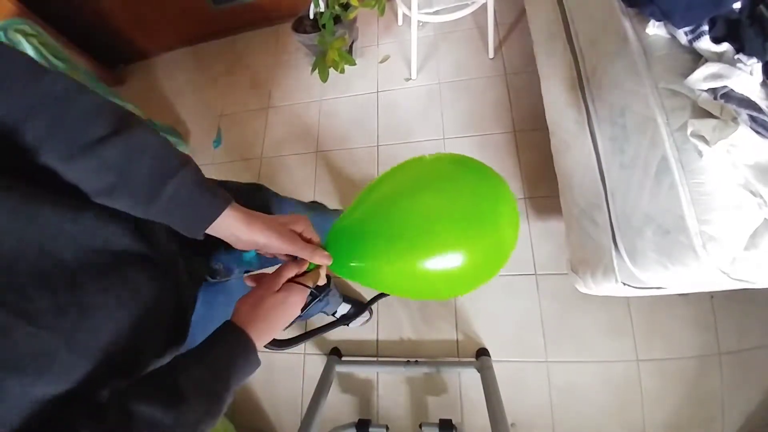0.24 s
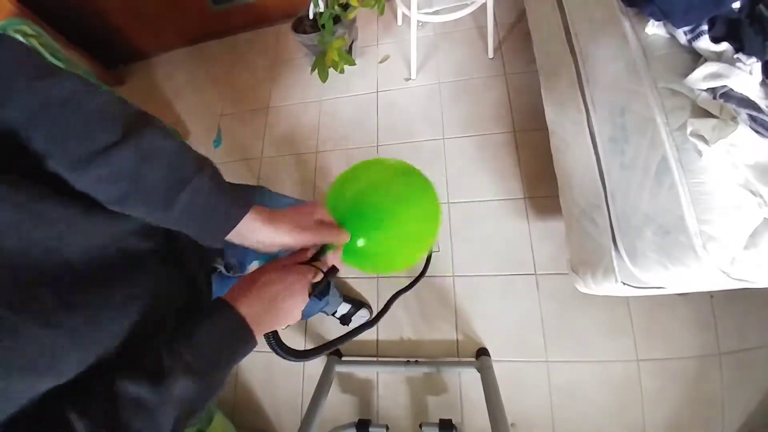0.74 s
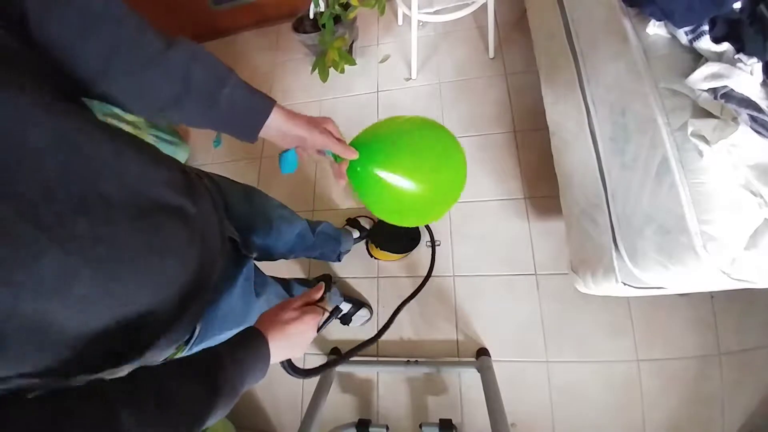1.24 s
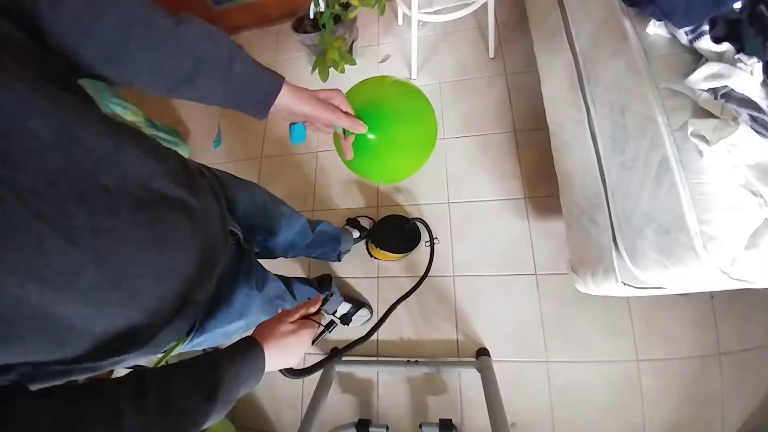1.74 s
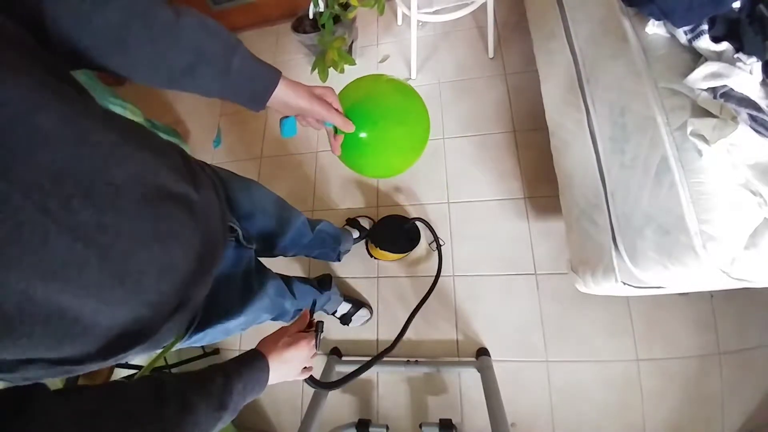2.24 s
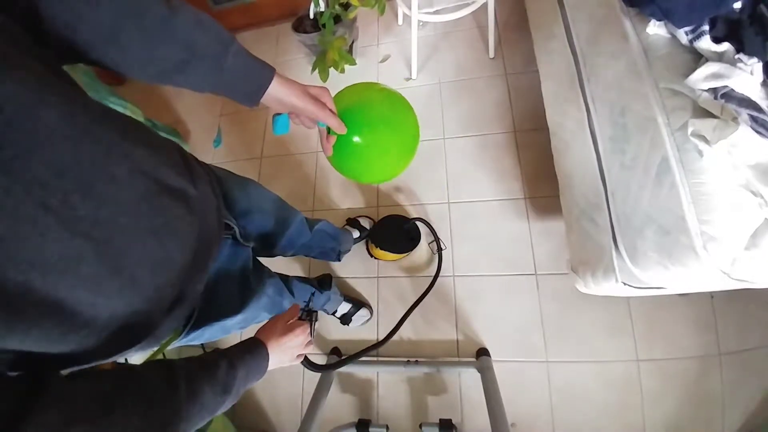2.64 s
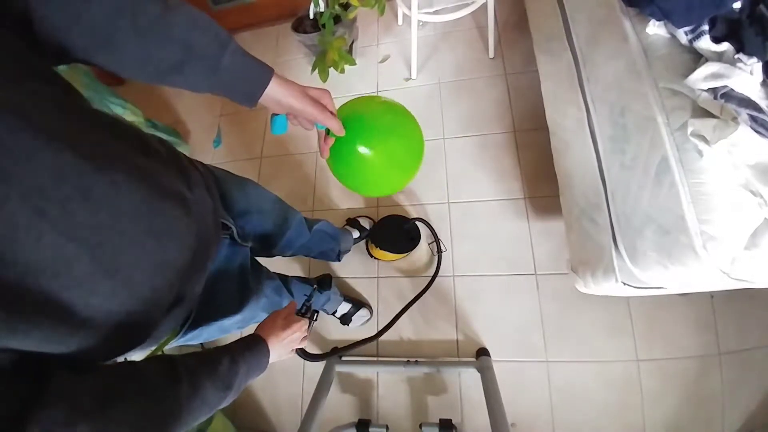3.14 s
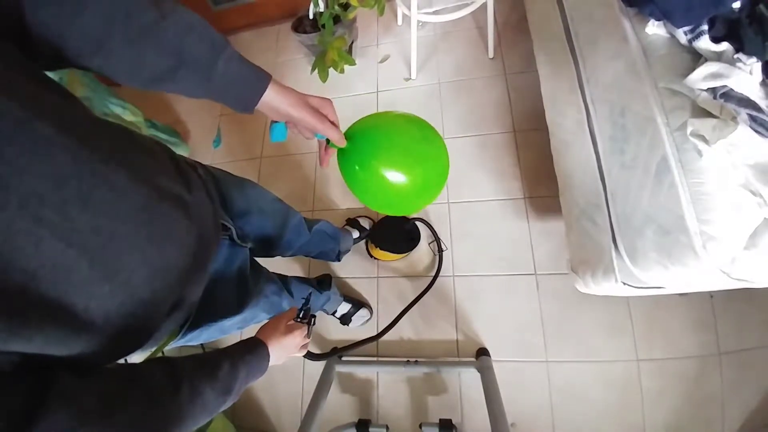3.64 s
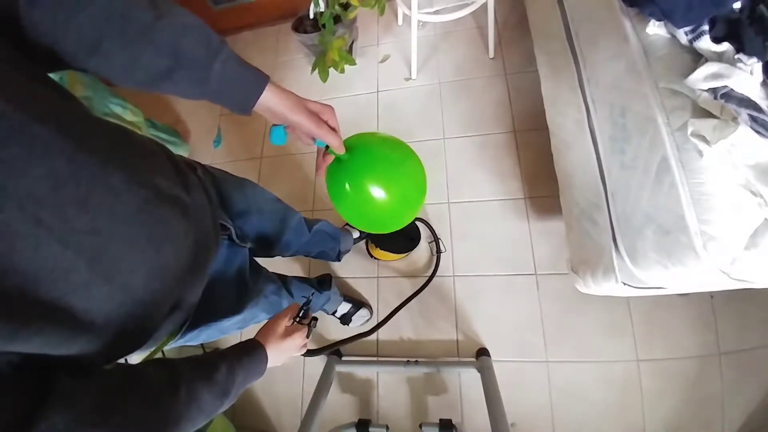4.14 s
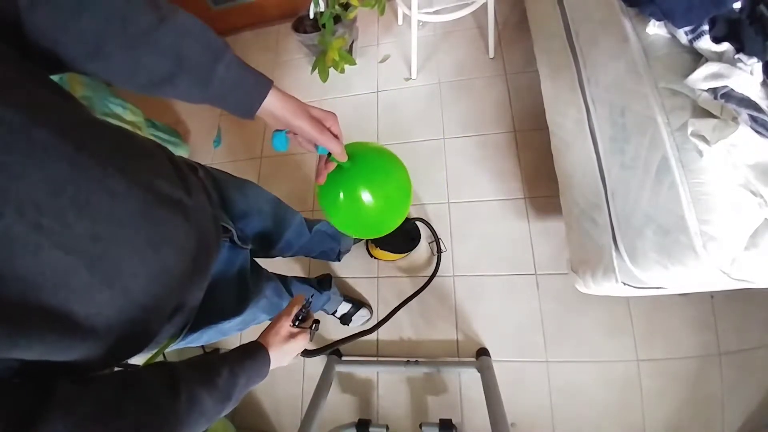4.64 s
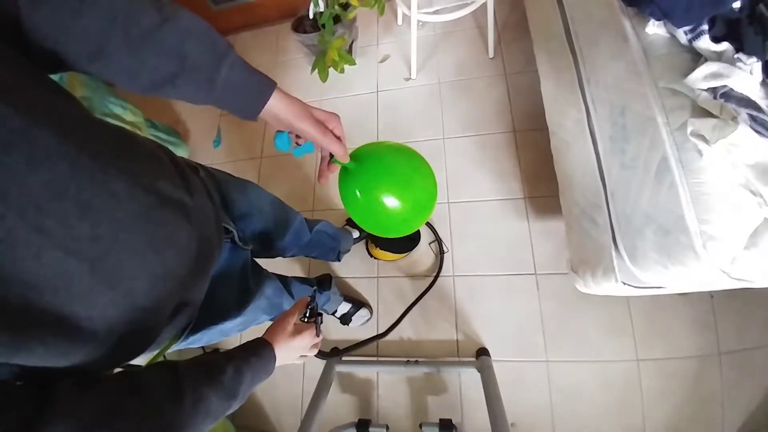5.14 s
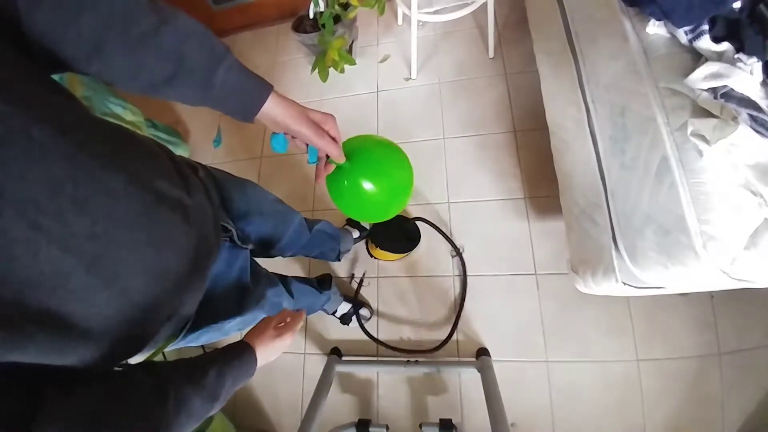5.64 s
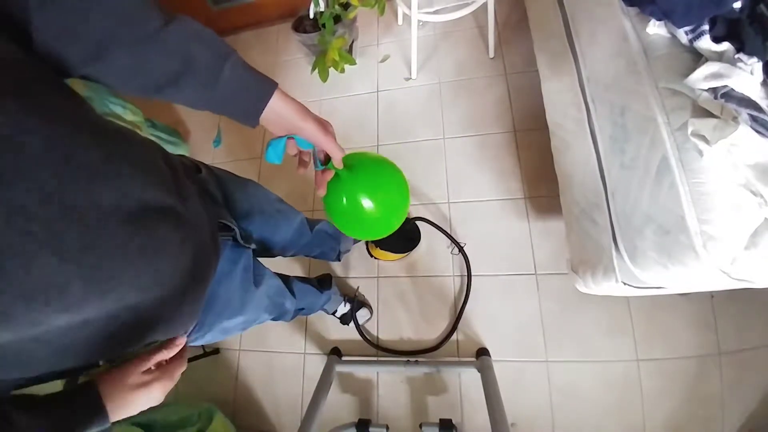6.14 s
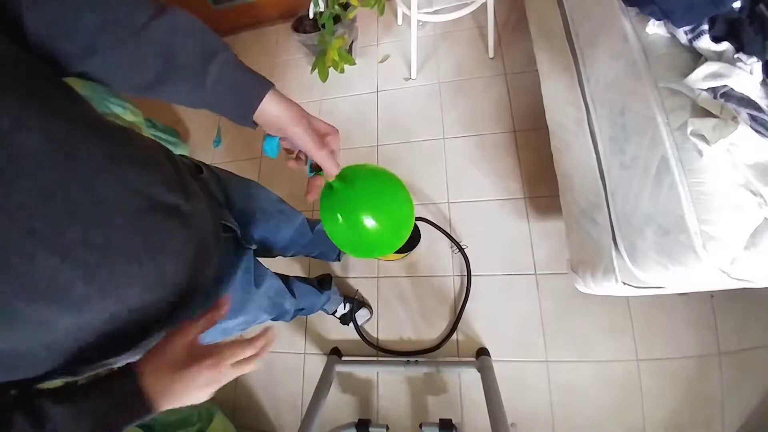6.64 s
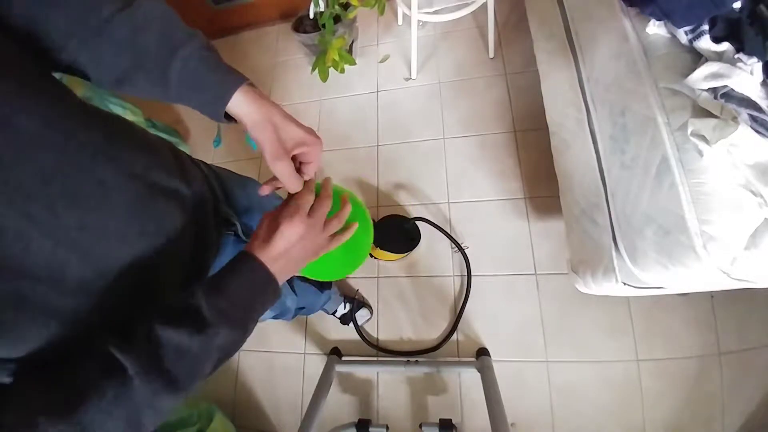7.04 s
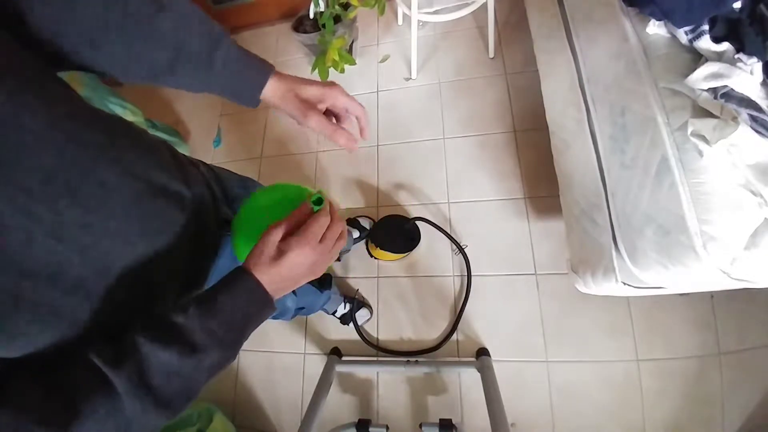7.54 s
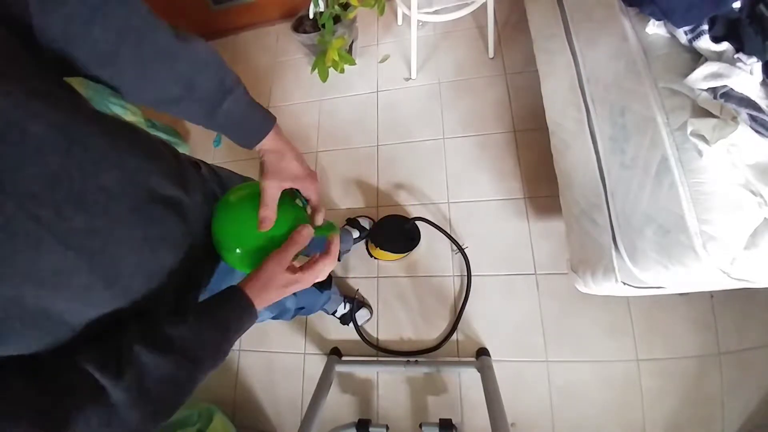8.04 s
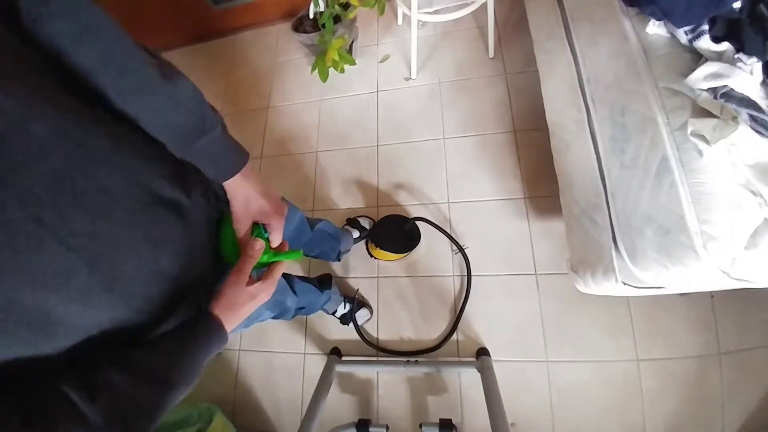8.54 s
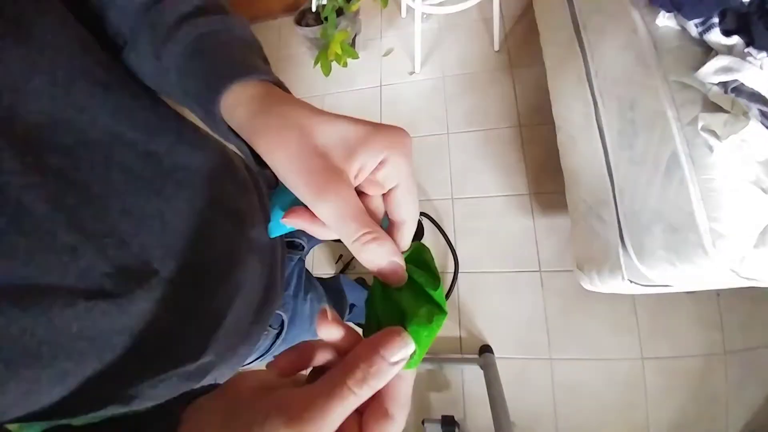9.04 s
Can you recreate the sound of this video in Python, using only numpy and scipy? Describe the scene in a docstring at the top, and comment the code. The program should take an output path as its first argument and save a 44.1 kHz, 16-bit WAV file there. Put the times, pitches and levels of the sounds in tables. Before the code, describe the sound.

A balloon is pulled off a hose with knocks, its pinched neck squeals in swoops, then hisses steadily, and hands crumple the rubber flat.

```python
"""Balloon let down in a tiled room

A balloon is pumped up close by and pulled off the hose nozzle, which leaks as shaped noise and knocks
as struck modes. The pinched neck flaps in squeals, a pulsed sum of overtones, then hisses; the hose
drops on the tiles and a hand squeezes out the last air with crumpling rubber and a hoarse whistle.
Two microphone ports differ in treble; a bed of low rumble rises and falls with the level of the air."""
import sys
import numpy as np
from scipy import signal
from scipy.fft import rfft, irfft, next_fast_len
from scipy.io import wavfile
from scipy.ndimage import uniform_filter1d

SR = 44100
rng = np.random.default_rng(int(sys.argv[2]) if len(sys.argv) > 2 else 0)


def log_audio(samples):
    """Write samples as a 16-bit WAV file to the path given in sys.argv[1]."""
    # one column per channel
    frames = np.atleast_2d(samples).T
    # limit to full scale, then quantise
    limited = np.clip(frames, -1, 1)
    pcm = np.round(limited * 32767).astype(np.int16)
    wavfile.write(sys.argv[1], SR, pcm)


N = 408790

# air from the nozzle, then from the neck as the pressure sags; the last three stand against the hiss:
# start_s, hiss_db, top_hiss_db, mid_hiss_db, hollow_rush_db (before pinches and band trims)
AIR_FLOW = [(0, -36.5, 5, -25, -20), (.128, -35, 3.5, -11.5, -20.5), (.19, -36, 4, -26, -31),
            (.32, -34, 4, -11, -21), (.36, -26.5, 2, -17.5, -32), (.5, -36.5, 5, 0.5, -7.5),
            (.6, -37, 0, 6, 3.5), (.688, -24, 1.5, -5.5, -15), (.738, -38, 5.5, 6, -6),
            (.768, -20, -10, -6.5, -32), (.9, -19.5, -8.5, -10.5, -32), (.948, -40, 2, -4, -11),
            (1.05, -68, -5.5, 2, 9), (1.12, -68, -2, 3, -7), (1.2, -63.5, 3, 2, -12),
            (1.3, -77.5, 6, 7.5, 4.5), (1.47, -52, -19.5, -14, -18), (1.52, -35, -12.5, -13, -35),
            (1.566, -17, -8, -9, -45), (1.642, -13, -5, -5, -33), (1.9, -18, -4, -6.5, -30),
            (2.2, -21, -2.5, -2.5, -19), (2.85, -20.5, -3, -4, -26), (3.3, -26.5, -4, -2, -12),
            (3.44, -28, -4.5, -3, -16), (4.04, -30, -6.5, -4.5, -12.5), (4.56, -34, -5.5, -1.5, -13.5),
            (5.5, -34, -7.5, -5, -15), (6.03, -36.5, -7.5, -5.5, -8.5), (6.4, -38.5, -9, -2.5, -16.5),
            (6.56, -39.5, -6, -4, -15), (6.95, -40, -8, -8.5, -14.5), (7.1, -38, -10.5, -2.5, -6.5),
            (7.2, -41.5, -8, -3, -6.5), (7.3, -44, -5.5, 0.5, -0.5), (7.54, -46.5, -12.5, 2.5, -12.5),
            (7.84, -37.5, -13.5, -4, -17), (7.96, -41.5, -2.5, 4, -2.5), (8.2, -45, -7.5, 2.5, -1),
            (8.5, -59.5, -11, 3, -4.5), (8.87, -100, -7.5, 2, 12), (9.0, -125, -7, 5, 19)]


def amp(db):
    """Gain of a level in dB."""
    return 10 ** (np.asarray(db) / 20)


def rms_one(x):
    """Scaled to rms 1."""
    return x / np.sqrt(np.mean(x ** 2) + 1e-20)


def in_time(rows):
    """Every column of a curve, sample by sample."""
    s, *columns = np.transpose(rows)
    return [np.interp(np.arange(N) / SR, s, column) for column in columns]


def at_hz(points, hz):
    """A spectrum read on a log-frequency axis."""
    point_hz, value = np.array(points).T
    return np.interp(np.log(hz), np.log(point_hz), value)


def drift(rate_hz):
    """Slow random wander of spread 1: noise through two equal low-pass poles, one value per 40 samples."""
    r = np.exp(-80 * np.pi * rate_hz / SR)
    noise = rng.standard_normal(N // 40 + 2002)
    slow = signal.lfilter([1], [1, -2 * r, r * r], noise)[2000:]   # settled part only
    return np.interp(np.arange(N) / 40, np.arange(len(slow)), rms_one(slow))


def ring(clicks, hz, t60_s):
    """A unit click sets a decaying sine of height 1 ringing."""
    r, w = amp(-60 / (t60_s * SR)), 2 * np.pi * hz / SR
    return signal.lfilter([0, np.sin(w)], [1, -2 * r * np.cos(w), r * r], clicks + 1e-18)


def turbulence(spectrum, patchy_db, count):
    """Stereo noise of rms 1, cut into bands that flicker both together and each by itself."""
    # how alike the noise is left and right, before the port colour: pitch_hz, likeness (0-1)
    likeness = [(60, 0.8), (110, 1), (200, 0.4), (380, 1), (700, 0.6), (1290, 0.8), (2380, 0.5),
                (4400, 0.98), (8120, 0.1), (15000, 0.3)]
    hz = np.fft.rfftfreq(N, 1 / SR) + 1
    alike = np.clip(at_hz(likeness, hz), 0, 1)
    mid, side = rfft(rng.standard_normal((2, N))) * amp(at_hz(spectrum, hz))
    both = np.sqrt(1 + alike) * mid + np.sqrt(1 - alike) * side * [[1], [-1]]
    lowest_hz, highest_hz = spectrum[0][0], spectrum[-1][0]
    place = np.log(hz / lowest_hz) / np.log(highest_hz / lowest_hz) * (count - 1)
    place = np.clip(place, 0, count - 1)
    together = drift(25)
    # triangular bands that overlap and add up to the whole
    bands = [irfft(both * np.clip(1 - abs(place - k), 0, 1), N) for k in range(count)]
    return rms_one(sum(band * amp(patchy_db * (drift(16.0) + 1.3 * together)) for band in bands))


def air(opening, flapping):
    """Jet noise at nozzle and neck: treble hiss, mid hiss and the hollow rush inside the balloon."""
    # relative noise colours, treble to low: pitch_hz, density_db (per Hz)
    top_colour = [(7500, -32), (9300, -2.5), (10400, 1.5), (11400, -1.5), (12500, -9), (14500, -11.5),
                  (16000, -18.5)]
    hiss_colour = [(2400, -31), (4000, -12), (5000, -12), (5800, -3.5), (6800, -1), (7400, 3.5),
                   (8200, -3.5), (9300, -11), (11000, -34)]
    mid_colour = [(650, -40), (1100, -10.5), (1390, -17.5), (1490, -11), (1870, -10), (2310, -4.5),
                  (3150, -1.5), (3500, -2.5), (3930, 1), (4400, -3), (4710, -0.5), (5010, -4.5), (5500, -3),
                  (7150, -25.5), (12100, -120)]
    rush_colour = [(110, -44.5), (180, -16), (231, -18.5), (296, -22), (335, -9), (437, -11.5), (546, 2),
                   (618, -0.5), (738, -5.5), (813, -1), (921, -12), (997, -13), (1380, -12.5),
                   (1500, -13.5), (1950, -25.5), (3300, -120)]
    # where the neck lies across the ports, 3.5 standing for the middle: start_s, side_db (left-right)
    side_of_neck = [(0, 1.5), (.6, 1.5), (.8, 3.5), (3.0, 3.5), (5.3, 5), (6.5, 2), (6.78, 6), (7.0, 4),
                    (8.5, 6)]
    lift_db, flap_rush_db = -85, -19.5   # rustle of the lift; rush stirred by flapping, against the squeal

    flow_db, top_db, mid_db, rush_db = in_time(AIR_FLOW)
    hiss_grip_db, other_grip_db = grip()
    other_db = flow_db + other_grip_db
    rustle = amp(lift_db) * lifted()

    hiss_level = amp(flow_db + hiss_grip_db) + .6 * rustle
    jet = hiss_level * turbulence(hiss_colour, 0.79, count=3)
    jet = jet + amp(other_db + top_db + 1.5) * turbulence(top_colour, 0.7, count=2)
    jet = jet + (amp(other_db + mid_db) + rustle) * turbulence(mid_colour, 0.64, count=4)
    pan_db = np.outer([.5, -.5], in_time(side_of_neck)[0] - 3.5)
    jet = jet * opening * amp(pan_db)

    rush_level = amp(other_db + rush_db + 3.0) + amp(flap_rush_db) * flapping + 3.5 * rustle
    return jet + rush_level * turbulence(rush_colour, 0.97, count=3)


def grip():
    """Fingers pinch the neck or let a gust through: change in dB of the hiss and of the other bands."""
    # start_s, held_s, hiss_change_db, other_change_db, lead_in_s, lead_out_s (leads at least 3 ms)
    pinches = [(.612, 0, -5, -5, .02, .015), (.66, 0, -2, -3, 0.016, .025),
               (1.77, 0.019, -29.5, -30.5, .13, .11), (2.058, 0.0086, -8, -10, 0.15, 0.066),
               (2.273, 0.0039, -5, -6, 0.041, 0.11), (2.699, 0.032, -8, -9, 0.077, 0.033),
               (2.914, 0.003, -3, -3, 0.064, 0.048), (5.196, 0, 5, 5, 0.033, .04),
               (5.3, 0.035, -3.5, -1, 0.099, 0.19), (5.69, 0.028, -11.5, -8.5, 0.15, 0.017),
               (5.89, 0.052, -3.5, -3.5, 0.11, 0.072), (6.2, 0.079, -24, -14, 0.071, 0.088),
               (6.476, 0.0044, -10, -10, 0.046, .08), (6.672, 0.023, -15.5, -22, .11, 0.083),
               (6.77, 0.078, 5, 3.5, .02, .09), (7.318, 0.0021, -13.5, -17.5, .018, 0.017),
               (7.385, 0.066, -29.5, -32.5, 0.067, 0.028), (7.678, 0, -1.5, -10, 0.1, 0.15),
               (8.014, 0, -5, -3.5, 0.053, 0.062)]
    t, change_db = np.arange(N) / SR, np.zeros((2, N))
    for s, held, hiss_db, other_db, lead_in, lead_out in pinches:
        held = max(held, 0)
        corners = [s - max(lead_in, .003), s, s + held, s + held + max(lead_out, .003)]
        change_db += np.outer([hiss_db, other_db], np.interp(t, corners, [0, 1, 1, 0]))
    return change_db


def rumble():
    """Low noise: a swell at each bump, a bed that goes with the level of the air, and the hum of the house."""
    # relative noise colours: pitch_hz, density_db (per Hz)
    rumble_colour = [(20, -33), (40, -16), (70, -6), (113, -1), (140, -8), (182, -3), (250, -11), (300, -5),
                     (400, -30.5)]
    hum_colour = [(25, -41), (42, -17.5), (55, -1), (62, -0.5), (80, -15.5), (120, -40.5)]
    # low hum of the house: start_s, level_db (before a 4 dB lift)
    hum = [(0.0, -63), (0.7, -63), (1.3, -71), (2.0, -75.5), (2.6, -65.5), (4.3, -60.5), (5.1, -71),
           (7.0, -66), (8.34, -61), (8.6, -77), (9.0, -105)]
    # rumble that goes with the air: start_s, level_db (against the hiss)
    flow_rumble = [(0, -19), (.5, -29), (.78, -52), (1.1, -1), (1.4, -6), (1.55, -42), (3.2, -40),
                   (3.4, -23), (4.0, -20.5), (4.5, -26.5), (6.5, -22.5), (7.4, -11.5), (7.8, -22),
                   (8.6, 6.5)]
    # hands bump and shift: peak_s, level_db (added to the bed)
    bumps = [(.52, -46), (.62, -37), (.99, -37.5), (1.09, -58.5), (1.66, -57), (1.9, -55), (2.2, -52),
             (2.41, -51.5), (2.64, -45.5), (2.795, -44.5), (2.865, -45.5), (3.12, -47), (5.8, -43),
             (6.06, -55), (6.75, -59.5), (7.08, -45), (8.025, -48.5), (8.18, -43), (8.26, -42), (8.43, -44)]
    bump_rise_db_per_s, bump_fall_db_per_s = 281, 191
    follows_grip = .45   # share of a pinch, in dB
    lift_rumble_db = -64.5

    t = np.arange(N) / SR
    bed_db = in_time(AIR_FLOW)[0] + follows_grip * grip()[1] + in_time(flow_rumble)[0]
    level = amp(bed_db) + amp(lift_rumble_db) * lifted()
    for s, db in bumps:
        level += amp(db - np.maximum(bump_rise_db_per_s * (s - t), bump_fall_db_per_s * (t - s)))
    handling = level * turbulence(rumble_colour, 3.5, count=2)
    return handling + amp(in_time(hum)[0] + 4.0) * turbulence(hum_colour, 0.55, count=2)


def knocks():
    """Every knock strikes the same dull modes with new strengths and adds a short bright crack."""
    # nozzle, hose and rubber knocks: start_s, body_db, crack_db (both before trims), body_t60_s
    strikes = [(0.02, -30.5, -50, 0.078), (0.284, -33, -48, 0.15), (0.524, -23.5, -30, 0.22),
               (0.635, -23, -22, 0.11), (0.982, -20.5, -40, 0.1), (5.584, -34, -42, 0.12),
               (5.699, -32, -48, 0.18), (5.744, -23.5, -20.5, 0.064), (5.774, -22, -28, 0.14),
               (5.809, -26, -43, 0.07), (5.959, -25.5, -26.5, 0.11), (6.205, -31, -30, 0.091),
               (7.475, -58, -59, 0.071), (8.171, -29.5, -29.5, 0.092), (8.209, -44, -33.5, 0.09),
               (8.238, -23, -36, 0.081), (8.268, -29.5, -38, 0.05), (8.324, -34, -37, 0.14),
               (8.379, -35, -36, 0.088), (8.412, -21.5, -34.5, 0.079), (8.441, -39, -38.5, 0.078),
               (8.499, -35, -46, 0.076), (8.569, -43.5, -52, 0.095), (9.211, -57.5, -73, 0.09)]
    # modes of the knocked body: pitch_hz, level_db (relative), t60_share (of body_t60_s)
    body_modes = [(125, 1.5, 0.9), (265, -5, 0.46), (484, 5.5, 0.6), (683, 10, 0.39), (918, 6, 0.39),
                  (1313, -0.5, 0.61), (1820, -5.5, 0.35)]
    # single rings: start_s, pitch_hz, level_db, t60_s
    single_rings = [(0.614, 175, -29.5, 0.68), (0.77, 70, -26.5, 0.083), (.614, 130, -20, 0.1),
                    (1.916, 184.5, -30, 0.21), (5.776, 3060, -33.5, 0.37)]

    out = np.zeros(N)
    chances = rng.standard_normal((len(strikes), len(body_modes)))
    crack_band = signal.butter(2, [1200, 9000], "band", fs=SR, output="sos")
    for (s, body_db, crack_db, t60), chance in zip(strikes, chances):
        start = round(s * SR)
        click = np.zeros(min(int(.25 * SR), N - start))
        click[40] = 1   # the body answers a millisecond into the contact
        body = 0
        for (hz, mode_db, share), c in zip(body_modes, chance):
            strength = amp(mode_db + 3.8 * c) * np.sign(c)
            body = body + strength * ring(click, hz, share * max(t60, .01))
        t = np.arange(len(click)) / SR
        fade = np.exp(-t / 0.0011) + 0.072 * np.exp(-t / 0.014)
        crack = rng.standard_normal(len(click)) * np.minimum(t / 0.0018, 1) ** 2 * fade
        crack = signal.sosfilt(crack_band, crack)
        out[start:start + len(click)] += amp(body_db - 15.5) * body + amp(crack_db + 18.5) * crack
    for s, hz, level_db, t60 in single_rings:
        click = np.zeros(N)
        click[round(s * SR)] = amp(level_db)
        out += ring(click, hz, t60)
    return out


def crumple():
    """Folds of rubber snap over at random into low, short modes."""
    # rubber rubbed or kneaded: start_s, length_s, level_db
    kneads = [(0.525, .08, -41), (5.97, 0.095, -53.5), (8.166, 0.25, -37.5)]
    fade_db_per_s = 167   # once the length is over
    t = np.arange(N) / SR
    kneading = np.zeros(N)
    for s, length, db in kneads:
        kneading += (t > s) * amp(db - fade_db_per_s * np.maximum(t - s - length, 0))
    snaps = rng.random(N) < 700 / SR   # 700 a second on average
    snaps = snaps * amp(5.2 * np.minimum(rng.exponential(1, N), 4.0)) * rng.choice([-1, 1], N)
    dealt = rng.integers(0, 6, N)   # which mode each snap strikes
    modes_hz = np.geomspace(310, 1050, num=6)
    folds = sum(ring(snaps * (dealt == k), hz, 8.8 / hz) for k, hz in enumerate(modes_hz))
    dulled = signal.lfilter([.3], [1, -.7], folds)
    return rms_one(dulled) * uniform_filter1d(kneading, size=100)


def squeal():
    """The neck's lips flap like a reed; returns the tone, the opening that pulses the jet, and the level."""
    # one table a swoop: start_s, flap_rate_hz, level_db (before a 3.5 dB cut), slackness (of the lips, 0-1)
    swoops = [
        [(0.875, 963, -50, 0), (0.891, 920, -36, 0), (0.91, 810, -50, 0)],
        [(1.552, 834, -41, 0.03), (1.56, 808, -21, 0), (1.584, 660, -22.5, 0), (1.6, 624.3, -16.5, 0),
         (1.646, 616.7, -18, 0.05), (1.67, 598, -28.5, 0.27), (1.69, 642, -31, 0.38), (1.72, 575, -45, 0.24)],
        [(1.83, 1037, -54, 0.07), (1.84, 1067, -24.5, 0), (1.868, 1016, -30.5, 0.05)],
        [(1.872, 720, -25, 0), (1.886, 613, -17.5, 0.46), (1.9, 484, -13, 0.2), (1.918, 404.2, -25, 0.2),
         (1.924, 438.6, -23, 0.97), (1.948, 427.6, -30.5, 0.2), (1.97, 442, -52, 0.64)],
        [(2.089, 541.5, -22, 0.63), (2.111, 364, -19, 0.71), (2.129, 319.2, -44.5, 0.8),
         (2.141, 446, -38, 0.46), (2.178, 350, -33, 0.1), (2.187, 335, -17.5, 0.75), (2.205, 376.7, -16, 0.76),
         (2.222, 385.5, -22.5, 0.9), (2.26, 309, -42.5, .8)],
        [(2.315, 631, -39, 0), (2.323, 618.8, -20, 0.06), (2.363, 564, -10.5, 0.03), (2.412, 471.5, -9, 0.12),
         (2.52, 548, -7, 0.02), (2.54, 554.7, -10.5, 0.06), (2.616, 518, -8, 0), (2.642, 621, -12, 0.13),
         (2.66, 656.7, -23.5, 0), (2.68, 747, -25, 0)],
        [(2.681, 752, -21, 0.1), (2.722, 769, -30, 0.04), (2.74, 772, -23, 0), (2.782, 637, -8, 0),
         (2.802, 565, -14.5, 0.03), (2.83, 431.5, -13, 0.11), (2.842, 524.5, -16, 0),
         (2.864, 629.4, -9.5, 0.09), (2.9, 683, -24, 0.01), (2.92, 695.4, -36, 0)],
        [(2.921, 693, -31, 0.03), (2.932, 693, -25, 0), (2.968, 609, -13.5, 0), (3.0, 478, -18.5, 0.42),
         (3.038, 418, -16, .8), (3.07, 371.5, -16.5, 0.39), (3.112, 326.5, -21, 0.63), (3.14, 329, -21, .7),
         (3.175, 360, -17.5, 0.72), (3.205, 330, -27, 0.69), (3.228, 320, -27, 0.68), (3.25, 320, -48.5, 0.57)],
    ]
    # how hard the lips slap shut: start_s, added_overtones_db, added_slope_db (per octave)
    slap = [(.89, -4, -0.5), (1.56, -2, -2.5), (1.62, -3.5, 5), (1.7, 6, -2), (1.84, -6.5, 5.5),
            (1.886, 5, -4.5), (1.92, 1, 1), (2.1, 1.5, 3.5), (2.14, -5, -2.5), (2.2, -2.5, 2), (2.36, 1, 0),
            (2.41, -5, 3), (2.52, 3.5, 0.5), (2.62, -0.5, 0), (2.72, 4, -4), (2.83, -0.5, -1),
            (2.97, -4.5, -2), (3.02, -8.5, 2), (3.07, 0, 0), (3.23, -5, -1)]
    # resonances of the air inside the balloon: pitch_hz, width_hz, level_db (relative)
    balloon_modes = [(494, 420, -2), (639, 140, -5.5), (833, 29, -0.5)]
    taut_rough, slack_rough = .055, .2   # roughness 0-1
    slack_skip, slack_jitter = .8, .02   # favour of every other flap; unsteadiness of the rate
    # overtones at 550 Hz: the faster the flap the purer; slack lips slap more
    overtone_base_db, overtone_db_per_octave, slack_overtone_db = -4.5, -3, 4
    tilt_db_per_octave = -5
    neck_cut_hz = 3900       # soft rubber closes too slowly for higher overtones
    neck_low_cut_hz = 280    # so small an opening radiates little bass

    hz, level_db, slack = in_time([row for swoop in swoops for row in swoop])
    t, sounding = np.arange(N) / SR, np.zeros(N)
    for swoop in swoops:
        sounding[(t >= swoop[0][0]) & (t <= swoop[-1][0] + .001)] = 1
    sounding = uniform_filter1d(sounding, size=90)

    slack = np.clip(slack, 0, 1)
    rough = taut_rough + (slack_rough - taut_rough) * slack
    skip = slack_skip * slack
    wander = .17 * rough * drift(90) + slack_jitter * slack ** 2 * drift(220)
    turns = np.cumsum(hz * (1 + wander)) / SR
    flap = turns.astype(int)

    # each flap has its own strength, taken smoothly from one to the next; slack lips favour every other flap
    chance = rng.standard_normal(flap[-1] + 2)
    strength = amp(10.0 * rough * np.interp(turns + .5, np.arange(len(chance)), chance))
    strength *= 1 + skip * np.cos(np.pi * turns + 0.54 * slack * drift(45))
    lean = 2.1 - 3.3 * skip   # taut lips give a sawtooth, slack ones a puff

    slap_db, slap_tilt_db = in_time(slap)
    overtone_db = slap_db + overtone_base_db + slack_overtone_db * slack
    overtone_db = overtone_db + overtone_db_per_octave * np.log2(hz / 550)
    # gentle flaps do not slap shut, so they are purer
    tilt_db = slap_tilt_db + tilt_db_per_octave + 0.25 * (level_db + 12.0)

    live = np.flatnonzero(sounding)
    tone, power = np.zeros(N), np.zeros(N)
    for k in range(1, 13):
        gain = np.ones(len(live))
        if k > 1:
            gain = amp(overtone_db[live] + tilt_db[live] * np.log2(k / 2))
        gain *= amp(3.1 * drift(22)[live] * (k > 1))   # each overtone swells and thins by itself
        gain /= 1 + (k * hz[live] / neck_cut_hz) ** 8
        tone[live] += gain * np.cos(k * 2 * np.pi * turns[live] - lean[live])
        power[live] += gain ** 2 / 2
    tone *= strength / np.sqrt(power + 1e-12)
    tone = signal.sosfilt(signal.butter(2, neck_low_cut_hz, "high", fs=SR, output="sos"), tone + 1e-18)
    # the resonances follow one another, each adding to the tone
    for mode_hz, width_hz, mode_db in balloon_modes:
        r = np.exp(-np.pi * width_hz / SR)
        poles = [1, -2 * r * np.cos(2 * np.pi * mode_hz / SR), r * r]
        tone = tone + amp(mode_db) * signal.lfilter([(1 - r * r) / 2, 0, (r * r - 1) / 2], poles, tone)
    opening = 1 + .5 * sounding * np.cos(2 * np.pi * turns)
    return tone * sounding * amp(level_db - 3.5), opening, sounding * amp(level_db)


def whistle():
    """A narrow slit makes the jet whistle hoarsely towards the left: a band of noise that sputters fast."""
    # relative noise colour: pitch_hz, density_db (per Hz)
    whistle_colour = [(5500, -29), (6700, -9), (7500, 1), (8200, -6), (9200, -30.5)]
    start_s, rise_s, held_s, fall_s = 6.7, 0.059, 0.12, .05
    level_db, pan_db = -30.5, 6.5   # level before the sputter and swell; left-right
    corners = np.cumsum([start_s, rise_s, held_s, fall_s])
    t = np.arange(N) / SR
    swell_db = np.interp(t, corners, [-24, 0, -3.5, -24])
    level = amp(level_db + swell_db + 3.4 * drift(150)) * (t > corners[0]) * (t < corners[-1])
    return level * turbulence(whistle_colour, 1.4, count=2) * amp([[pan_db / 2], [-pan_db / 2]])


def lifted():
    """Rises from 0 to 1 as the empty balloon is lifted and rustles."""
    lift_s, rise_s = 9.17, 0.034
    return np.clip((np.arange(N) / SR - lift_s) / rise_s, 0, 1)


def room(x):
    """Tiled room as six dull feedback delays a side, evaluated in frequency."""
    t60_s, wall_cut_hz = 0.17, 7000   # decay before the walls' treble loss
    low_cut_hz = 450                  # well below this both ports hear the same
    size = next_fast_len(N + SR)
    hz, spectrum = np.fft.rfftfreq(size, 1 / SR), rfft(x, size)
    out = np.zeros((2, len(hz)), complex)
    for k, lag_s in enumerate(rng.uniform(.012, .04, size=12)):
        loop = amp(-60 * lag_s / t60_s) * np.exp(-2j * np.pi * hz * lag_s) / (1 + 1j * hz / wall_cut_hz)
        out[k % 2] += loop / (1 - loop) * (-1) ** (k // 2)
    alike = 1 / (1 + (hz / low_cut_hz) ** 2)
    out = (1 - alike) * out + alike * out.mean(axis=0)
    return irfft(out * spectrum, size)[:, :N]


def ports(stereo):
    """The housing notches the treble, and each microphone port adds a colour and phase of its own."""
    # common to both ports: pitch_hz, level_db
    housing = [(20, -21), (45, -4.5), (8000, -1), (9100, -10), (10000, -1.5), (13000, -4)]
    # colour between the ports: pitch_hz, difference_db (left-right)
    port_colour = [(60, -0.5), (92, 2.5), (140, -1.5), (210, 1.5), (330, -0.5), (500, 4), (770, 1.5),
                   (1170, -2), (1790, -1.5), (2740, 0), (4190, -1), (6410, 7), (9810, -6), (15000, -17.5)]
    # phase by which the left port leads: pitch_hz, lead_rad
    left_lead = [(60, 0), (2000, -.2), (2700, 0.95), (3300, 0.93), (6500, 1.31), (6900, 1.1), (8400, -0.19),
                 (10100, -0.83), (11100, .3), (13100, .5), (14200, 1.9)]
    hz = np.fft.rfftfreq(N, 1 / SR) + 1
    halves = [.5, -.5]   # left and right share each difference
    colour = amp(at_hz(housing, hz) + np.outer(halves, at_hz(port_colour, hz)))
    phase = np.exp(1j * np.outer(halves, at_hz(left_lead, hz)))
    return irfft(rfft(stereo) * colour * phase, N)


def scene():
    """Near sources with their room, then the air, the whistle and the rumble without it."""
    room_db = -6
    tone, opening, flapping = squeal()
    near = tone + knocks() + crumple()
    return near + amp(room_db) * room(near) + air(opening, flapping) + whistle() + rumble()


def record(dry):
    """Port colour, softly rounded peaks, and a steep cut of the top."""
    rounded = 1.38 * np.tanh(ports(dry) / 1.188)
    top_cut = signal.cheby2(12, 60, 15800, fs=SR, output="sos")   # 60 dB down from 15.8 kHz
    return signal.sosfilt(top_cut, rounded)


dry = scene()
out = record(dry)
log_audio(out)
```